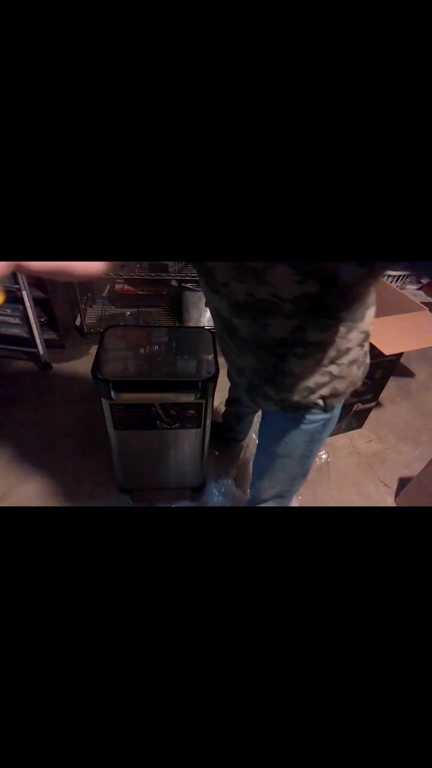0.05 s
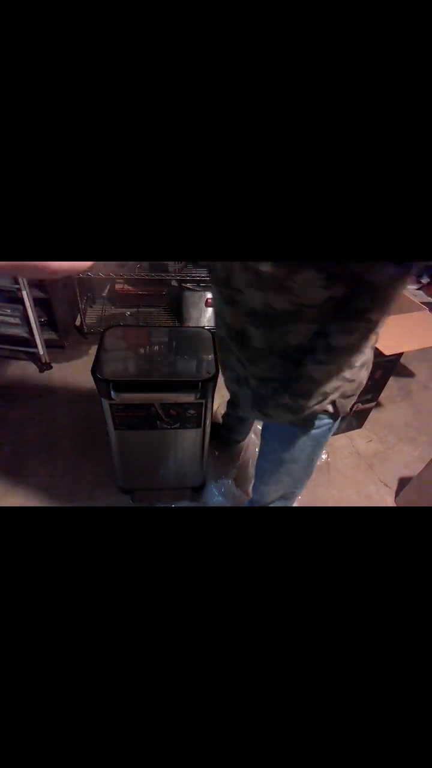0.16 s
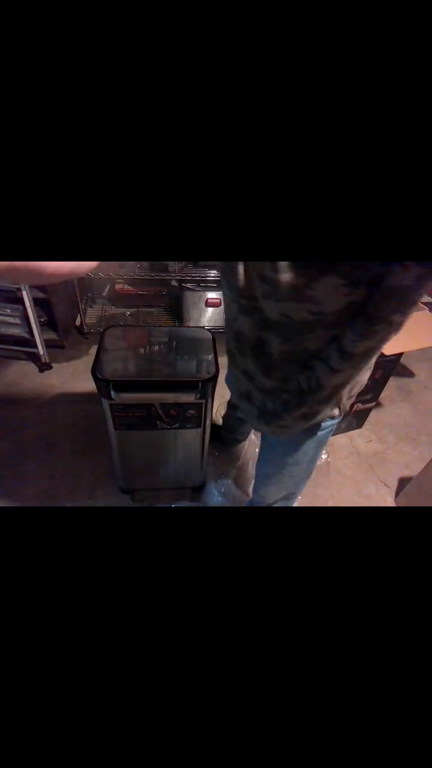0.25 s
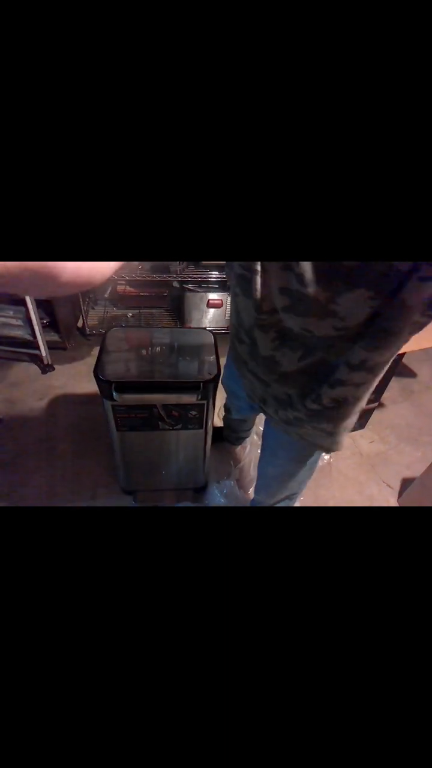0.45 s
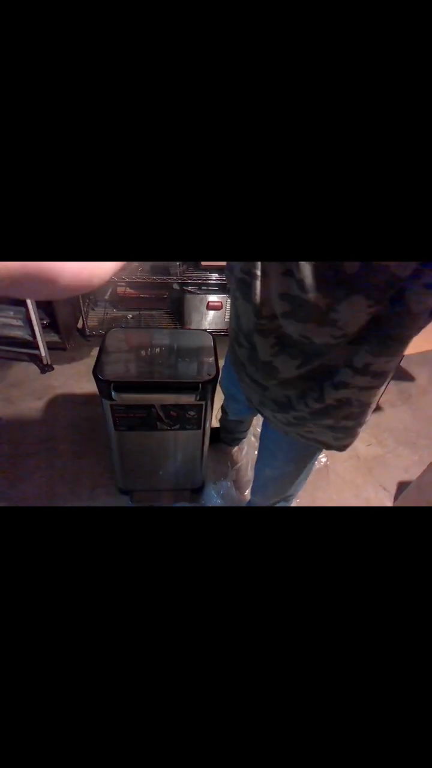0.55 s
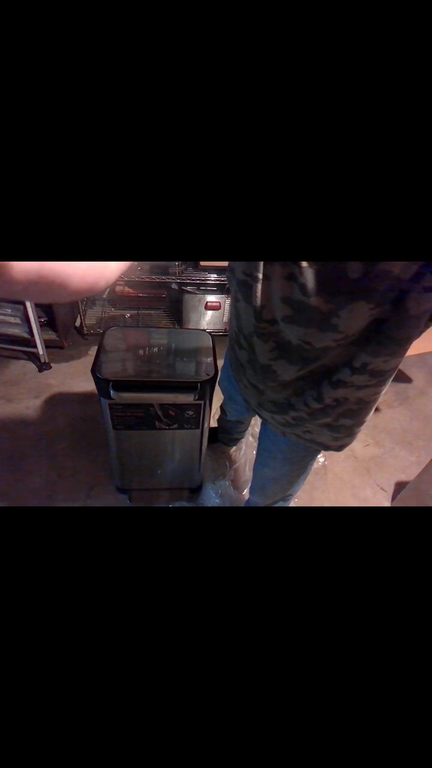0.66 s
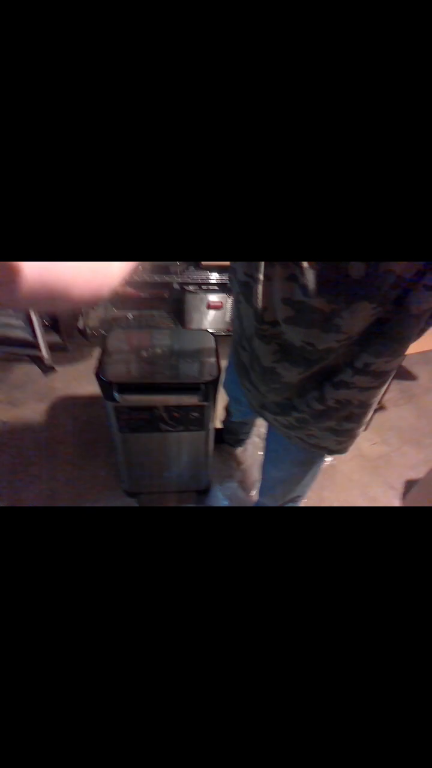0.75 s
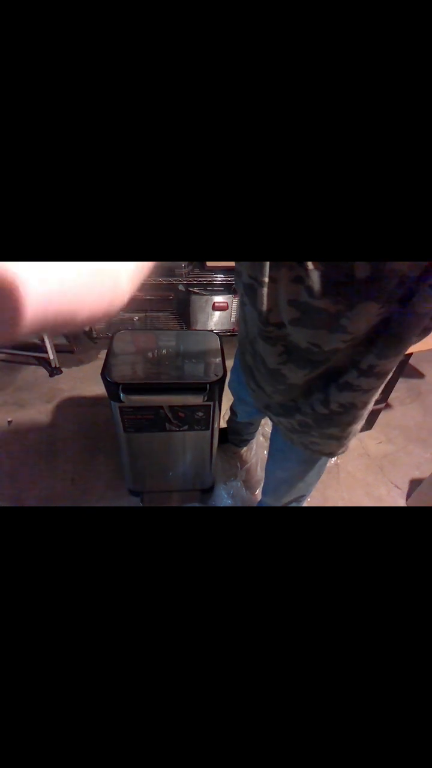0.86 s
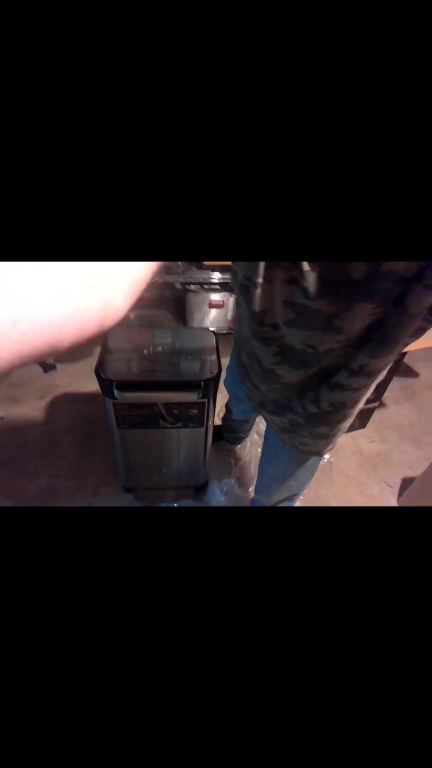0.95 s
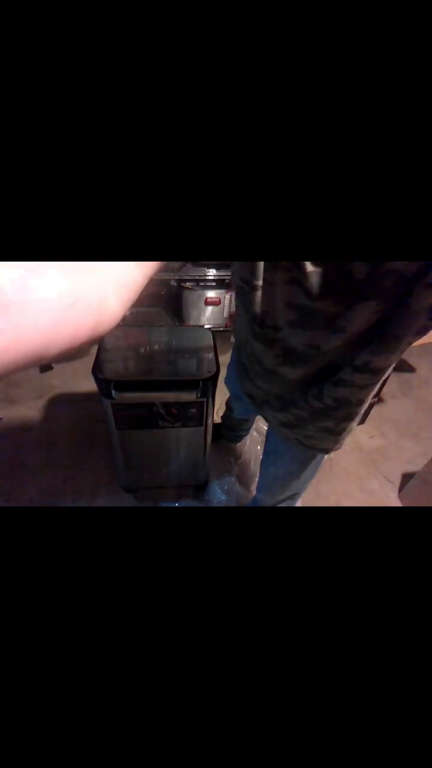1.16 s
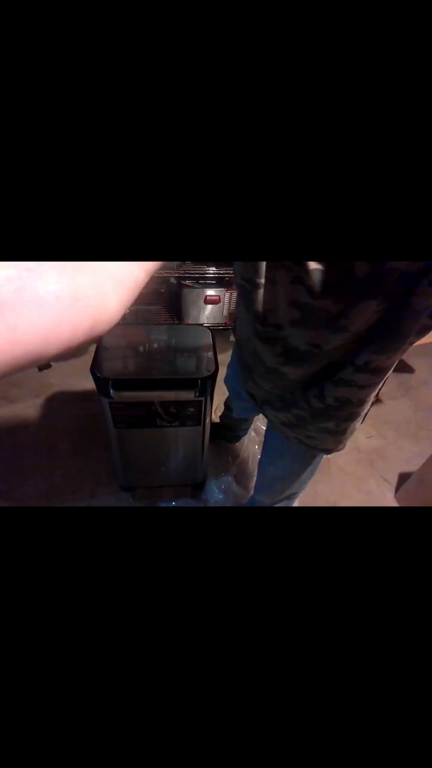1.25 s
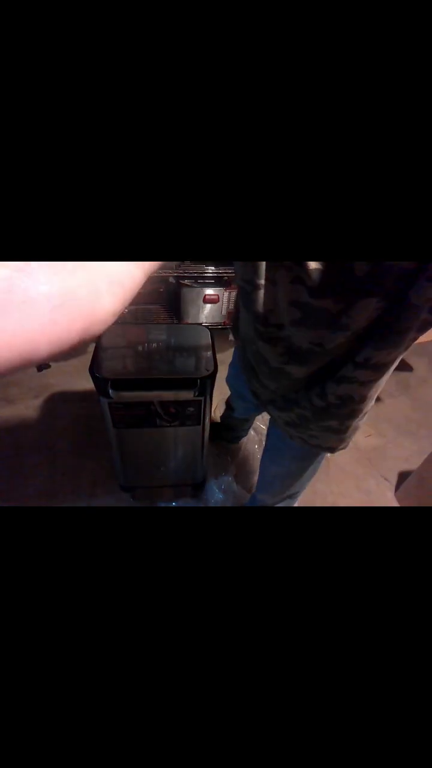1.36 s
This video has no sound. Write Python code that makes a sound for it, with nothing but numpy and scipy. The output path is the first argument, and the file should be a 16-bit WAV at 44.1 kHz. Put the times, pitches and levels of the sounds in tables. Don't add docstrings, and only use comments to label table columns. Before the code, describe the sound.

A hollow steel bin is handled on concrete, close to the microphone. Soft rumble and scuffs lead to a light edge bump at 0.3 s, with lid ticks and a metallic clack at 0.4. A hard, deep thud with rattling panels lands at 0.55, a softer boom at 0.75, then the heaviest, flattened thump at 1.08. Faint settling, pings and rustling follow from 1.2 in a dull, small basement.

```python
import sys
import numpy as np
from scipy import signal
from scipy.io import wavfile
from scipy.ndimage import uniform_filter1d

SR = 44100
rng = np.random.default_rng(int(sys.argv[2]) if len(sys.argv) > 2 else 0)


def convert_level_to_amplitude(level_db):
    exponent = np.asarray(level_db, float) / 20
    return 10 ** exponent


def log_audio(samples):
    frames = np.atleast_2d(samples).T
    limited = np.clip(frames, -1, 1)
    pcm = np.round(limited * 32767).astype(np.int16)
    wavfile.write(sys.argv[1], SR, pcm)


N = 61739


def level(x, db):
    return x * convert_level_to_amplitude(db) / np.sqrt(np.mean(x ** 2))


def swell(start, rise, t60):
    since = np.maximum(np.arange(N) / SR - start, 0)
    growth = np.sin(np.pi / 2 * np.minimum(since / rise, 1)) ** 2
    fade = np.exp(-np.log(1000) * np.maximum(since - rise, 0) / t60)
    return since, growth * fade


def swing(start, db, hz, rise, t60):
    since, loudness = swell(start, rise, t60)
    return -convert_level_to_amplitude(db) * loudness * np.sin(2 * np.pi * hz * since)


def mode(x, hz, t60):
    pole = np.exp(2j * np.pi * hz / SR - np.log(1000) / (max(t60, .005) * SR))
    return signal.lfilter([1], [1, -pole], x).imag


def band(x, hz, width):
    return signal.lfilter(*signal.iirpeak(min(hz, 15000), hz / width, fs=SR), x)


def walk(rate):
    hold = int(SR / rate)
    steps = np.repeat(rng.standard_normal(N // hold + 1), hold)
    return level(uniform_filter1d(steps, hold)[:N], 0)


def wavering(hz, depth, rough_db):
    cycles = hz * np.cumsum(1 + depth * walk(300)) / SR
    return np.sin(2 * np.pi * cycles) * convert_level_to_amplitude(rough_db * walk(200))


# start in seconds, level in dB, pitch in Hz, rise in seconds, 60 dB fade in seconds.
LANDINGS = [
    (0.2861, -17, 85.6, 0.011, 0.13),
    (.5540, -1, 81, 0.01555, 0.076),
    (0.7445, -19.5, 74.5, 0.012, 0.11),
    (1.0788, 2, 97.9, 0.014, 0.049),
    (1.213, -29.5, 80, 0.0028, 0.094),
    (1.294, -28, 81, 0.0063, 0.071),
]


def thuds():
    out = 0
    for start, db, hz, rise, t60 in LANDINGS:
        out = out + swing(start, db, hz, rise, t60)
        out = out + swing(start, db - 20.5, 2.067 * hz, rise, t60)
    return out


# start in seconds, level in dB, pitch in Hz, rise in seconds, 60 dB fade in seconds.
BOOM = [(.019, -31.5, 50.8, 0.011, 0.19), (0.127, -41, 42.4, 0.031, 0.58),
        (0.175, -19.5, 53.24, 0.066, 0.3), (0.211, -24, 55, 0.041, 0.64), (0.345, -13.5, 57.5, 0.013, 0.31),
        (0.406, -18.5, 31.7, .015, 0.48), (0.562, -10.5, 53.4, 0.024, 0.29), (0.7407, -13, 52, 0.018, 0.49),
        (.80, -22.5, 28.07, 0.015, 0.5), (.935, -34, 55, 0.029, 0.29), (.99, -34.5, 55, 0.028, 0.22),
        (1.329, -36, 32.9, 0.022, 0.44), (1.088, -2, 52.24, 0.0096, 0.19), (1.093, -26, 28.5, 0.014, 0.66),
        (1.219, -27.5, 55, 0.022, .3)]


def booms():
    return sum(swing(*row) for row in BOOM)


# start in
# seconds, level in dB, pitch in Hz, rise in seconds, 60 dB fade in seconds.
KNOCKS = [
    (.563, -35.5, 660, 0.0097, 0.042),
    (.556, -31.5, 396, 0.0056, 0.036),
    (.577, -41, 560, .005, 0.057),
    (.580, -18.5, 172, 0.011, 0.054),
    (1.084, -30.5, 590, 0.0074, 0.092),
    (1.102, -44, 540, .006, .1),
    (1.097, -26.5, 190, 0.0042, .1),
    (1.0975, -15.5, 95, 0.0028, 0.094),
    (1.106, -24, 150, .008, 0.1),
]


def knocks():
    return sum(swing(*row) for row in KNOCKS)


# start in seconds, level in dB, rise in seconds,
# 60 dB fade in seconds, extra level of the low panels in dB.
RATTLES = [
    (0.285, -48.5, 0.0058, 0.23, -3.5),
    (0.397, -47, 0.0049, 0.047, -11),
    (0.557, -32.5, 0.008, 0.12, -3),
    (0.743, -47.5, 0.0096, 0.39, 2),
    (1.077, -30.5, 0.0085, 0.11, -7),
]
# pitch in Hz, level in dB, 60 dB fade in seconds.
PANELS = [(166, 0, 0.067), (177, 12.5, 0.035), (267, -3.5, 0.073), (310, -5, 0.029), (400, -11, 0.013),
          (452, -6, 0.095), (552, -4, 0.094), (652, -4.5, 0.04), (860, -6.5, 0.02), (943, -6, 0.042),
          (1118, -12.5, 0.054), (1240, -18.5, 0.15), (1704, -24, 0.13)]


def rattling_panels():
    noise = rng.standard_normal(N)
    low_push, high_push = 0, 0
    for start, db, rise, t60, low_db in RATTLES:
        loudness = swell(start, rise, t60)[1]
        low_push = low_push + convert_level_to_amplitude(db - 26 + low_db) * loudness * noise
        high_push = high_push + convert_level_to_amplitude(db - 26) * loudness * noise
    out = 0
    for hz, db, t60 in PANELS:
        push = low_push if hz < 420 else high_push
        out = out + convert_level_to_amplitude(db) * mode(push, hz, t60)
    return out


# start in seconds, ring level in dB, rise in seconds, 60 dB fade in seconds.
LID = [(0.221, -43.5, 0.011, 0.031), (0.314, -35.5, 0.008, 0.077), (0.33, -49, 0.0034, .025),
       (0.378, -45, 0.006, 0.039), (0.396, -32, 0.018, 0.056), (0.433, -47, 0.0086, 0.025),
       (0.453, -51.5, 0.0035, 0.04), (0.467, -50.5, 0.0083, 0.082), (.503, -54.5, 0.0074, 0.035),
       (.875, -54, .01, .08), (1.201, -41.5, 0.016, 0.13)]


def lid():
    rubbing = sum(convert_level_to_amplitude(db) * swell(start, rise, t60)[1] for start, db, rise, t60 in LID)
    return wavering(554, 0.016, 2.6) * rubbing


# start in seconds, level in dB, pitch in Hz, 60 dB fade in seconds.
PINGS = [(.238, -67, 4200, .06), (.332, -56, 5800, .015), (.3219, -42, 5880, .011),
         (.3219, -43, 7120, .011), (.3221, -47, 9200, .011), (.3216, -47, 4200, .011),
         (.3958, -50, 10040, .02), (.392, -61, 9800, .015), (.3962, -53, 6400, .02),
         (.3985, -36, 1200, .05), (0.3952, -39, 2160, 0.023), (0.383, -42, 1800, 0.023),
         (.428, -60, 2750, .6), (.494, -61, 2800, .15), (.4945, -54, 6800, .015), (.555, -43.5, 2850, .06),
         (.560, -53, 4700, .025), (.707, -56, 3450, 0.084), (.748, -55.5, 3340, .07),
         (.748, -55, 2400, .07), (.809, -65, 2270, .06), (.86, -71.5, 3600, .2), (.935, -59.5, 980, .15),
         (.885, -58, 1320, .1), (1.228, -70.5, 5100, .1), (1.32, -71, 2700, .05), (1.362, -65.5, 5800, 0.3),
         (1.6, -61.5, 5450, 0.16)]


def pings():
    out = 0
    for start, db, hz, t60 in PINGS:
        rough = 2.0 if t60 > .05 else 1
        loudness = swell(start, rough * .0012, t60)[1]
        tone = wavering(hz, rough * .02, rough * 3.0)
        out = out + convert_level_to_amplitude(db - 5) * loudness * tone
    return out


def grainy_puff(start, db, hz, rise, t60):
    noise = convert_level_to_amplitude(1.6 * walk(250)) * rng.standard_normal(N)
    puff = level(swell(start, rise, t60)[1] * noise, 0)
    rings = 0
    for ring_hz in hz * np.exp(.4 * rng.uniform(-1, 1, 3)):
        rings = rings + level(band(puff, ring_hz, .12 * ring_hz), -10)
    air = puff
    for _ in range(3):
        air = band(air, hz, hz)
    length_gain = np.sqrt((rise + t60 / 14) * SR / N)
    return convert_level_to_amplitude(db - 6) * (rings + level(air, -4)) * length_gain


# start in seconds, level in dB, centre pitch in Hz, 60 dB fade in seconds.
TICKS = [(0.226, -51, 650, .04), (1.0432, -57.5, 1200, 0.036), (.238, -57, 6500, 0.11),
         (0.3224, -48, 6000, 0.0091), (.329, -53, 6500, 0.012), (0.3312, -59, 9000, .012),
         (0.337, -59, 7000, 0.019), (0.397, -51, 8500, 0.013), (0.3959, -37, 1200, 0.035),
         (.4035, -46.5, 3000, 0.021), (0.405, -59.5, 9500, 0.038), (0.412, -68, 4800, 0.013),
         (.423, -53.5, 2800, 0.018), (0.4952, -57.5, 6800, 0.012), (0.5589, -56.5, 4500, 0.0081),
         (0.572, -57, 3600, 0.046), (0.6812, -67.5, 2200, .03), (1.0831, -40, 2900, 0.02),
         (1.084, -49, 7000, .012), (1.0875, -45, 3500, .02), (1.087, -55, 8000, 0.011),
         (1.093, -46.5, 3000, 0.04), (1.095, -61, 8000, .04), (1.102, -53, 3000, 0.087),
         (1.201, -62, 1470, 0.026), (1.2265, -59, 2800, 0.1), (1.3198, -58, 3000, 0.055)]


def ticks():
    return sum(grainy_puff(start, db, hz, .0006, t60) for start, db, hz, t60 in TICKS)


# start in seconds, level in dB, centre pitch in Hz, rise in seconds, 60 dB fade in seconds.
SCUFFS = [(0.066, -59.5, 1490, 0.0071, 0.13), (0.027, -67.5, 2920, 0.016, 0.64),
          (0.068, -66, 6400, 0.004, 0.21), (.155, -65, 3000, 0.012, 0.98), (0.28, -54, 2940, 0.0087, 0.58),
          (.33, -66, 5620, 0.013, 0.34), (0.39, -51, 3060, 0.0064, 0.072), (0.36, -67, 2500, 0.015, .5),
          (.538, -57.5, 2820, 0.0064, 0.12), (.554, -47.5, 3000, 0.0036, 0.1),
          (.702, -65, 3480, 0.0029, 0.1), (0.701, -56, 1194, 0.0092, 0.36), (.845, -70, 3480, 0.01, 0.14),
          (.87, -75, 1400, 0.0067, 0.16), (1.035, -59.5, 2645, 0.028, 0.18),
          (1.03, -53.5, 970, 0.039, 0.41), (1.288, -64, 2530, 0.013, 0.33),
          (1.316, -60.5, 3100, 0.0037, 0.19), (1.325, -58.5, 1650, 0.0068, 0.15),
          (1.365, -60.5, 1920, .02, 0.24), (.48, -48, 165.5, 0.022, 0.24), (.62, -49.5, 200, 0.026, 0.12),
          (0.991, -55.5, 216, 0.03, .2), (0.17, -49, 84.5, 0.0089, 0.11), (1.091, -38, 1080, 0.0076, 0.076),
          (1.083, -41.5, 2100, 0.0043, 0.12), (.557, -40.5, 700, 0.0093, .1), (1.12, -45, 378, 0.018, 0.29),
          (.83, -48.5, 294, .03, .3), (1.357, -73, 5200, 0.02, 0.18), (.93, -47.5, 110, 0.033, .4)]


def scuffs():
    return sum(grainy_puff(*row) for row in SCUFFS)


# pitch in Hz, width in Hz, level in dB.
SHAKE = [(27.7, 8.3, 0), (55, 6.5, -0.5), (85, 40, -6.5), (160, 57, -17), (305, 130, -34.5)]


def shaking():
    out = 0
    for hz, width, db in SHAKE:
        wobble = band(band(rng.standard_normal(N), hz, width), hz, width)
        out = out + level(wobble, db)
    return out


# pitch in Hz, level in dB per Hz.
RUSTLE = [(180, -29), (300, 6), (418, 3), (591, 2.5), (787, -1.5), (1290, -7.5), (2630, -18.5),
          (2960, -20.5), (11000, -42), (14300, -76), (22000, -120)]


def rustling():
    out = 0
    table_hz, table_db = np.array(RUSTLE).T
    for hz in 330 * 2 ** np.arange(0, 5.2, .4):
        hits = rng.random(N) < 1500 / SR
        hits = hits * convert_level_to_amplitude(2.5 * rng.exponential(size=N))
        grains = signal.lfilter([1], [1, -np.exp(-1 / (.002 * SR))], hits) * rng.standard_normal(N)
        grains = level(band(band(grains, hz, 0.34 * hz), hz, 0.34 * hz), 0)
        db = np.interp(np.log(hz), np.log(table_hz), table_db)
        db = db + 10 * np.log10(hz)
        out = out + convert_level_to_amplitude(db + 1.8 * walk(18)) * grains
    return level(out, 0.42)


# time in seconds, shaking in dB, scraping in dB.
HANDLING = [(0, -64, -74.5), (0.044, -42, -64), (0.103, -57.5, -69), (0.146, -28.5, -63.5),
            (0.239, -32.5, -54.5), (.31, -26, -49), (0.399, -26, -52.5), (.45, -42, -58.5),
            (.51, -54.5, -64), (0.6, -25.5, -58), (.7, -39.5, -62.5), (0.782, -30.5, -62.5),
            (0.899, -45, -62), (1, -43.5, -67), (1.062, -35, -55), (1.131, -33, -64.5), (1.191, -36, -61),
            (1.281, -36, -62.5), (1.4, -50, -71.5)]


def handling():
    times, shake_db, scrape_db = np.array(HANDLING).T
    now = np.arange(N) / SR
    shake = shaking() * convert_level_to_amplitude(np.interp(now, times, shake_db) - 2.0)
    return shake + rustling() * convert_level_to_amplitude(np.interp(now, times, scrape_db))


def room(x):
    t60, centre_hz = 0.033, 2530
    t = np.arange(int(.4 * SR)) / SR
    tail = band(rng.standard_normal(len(t)), centre_hz, 2 * centre_hz)
    tail = tail * np.exp(-np.log(1000) * t / t60) * (t > .004)
    tail = tail / np.sqrt(np.sum(tail ** 2))
    return convert_level_to_amplitude(-19.5) * signal.fftconvolve(x, tail)[:N]


def scene():
    body = thuds() + booms() + knocks() + rattling_panels()
    metal = lid() + pings()
    near = body + metal + ticks() + scuffs() + handling()
    return (near + room(near))[None]


def top_cut(x):
    return signal.sosfilt(signal.butter(12, 15750, fs=SR, output="sos"), x)


def record(dry):
    x = signal.sosfilt(signal.butter(1, 14, "high", fs=SR, output="sos"), dry)
    limit, knee = np.where(x > 0, .82, .64), 12.0
    x = x / (1 + np.abs(x / limit) ** knee) ** (1 / knee)
    hiss = (convert_level_to_amplitude(-99) + convert_level_to_amplitude(-75) * np.abs(x) ** .9) * rng.standard_normal(x.shape)
    x = signal.sosfilt(signal.ellip(8, .2, 30, 11100, fs=SR, output="sos"), x) + hiss
    x = signal.sosfilt(signal.ellip(8, .2, 60, 15700, fs=SR, output="sos"), x)
    return top_cut(x)


dry = scene()
out = record(dry)
log_audio(out)
```